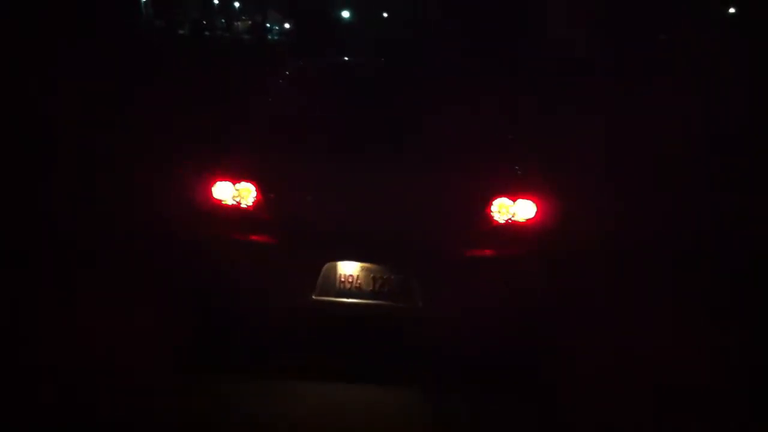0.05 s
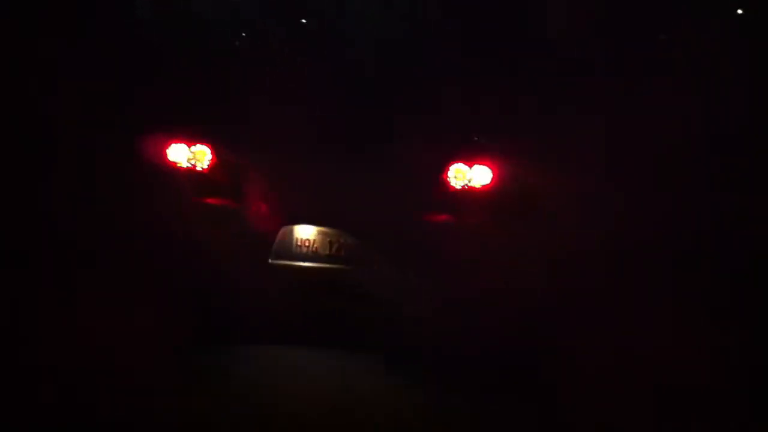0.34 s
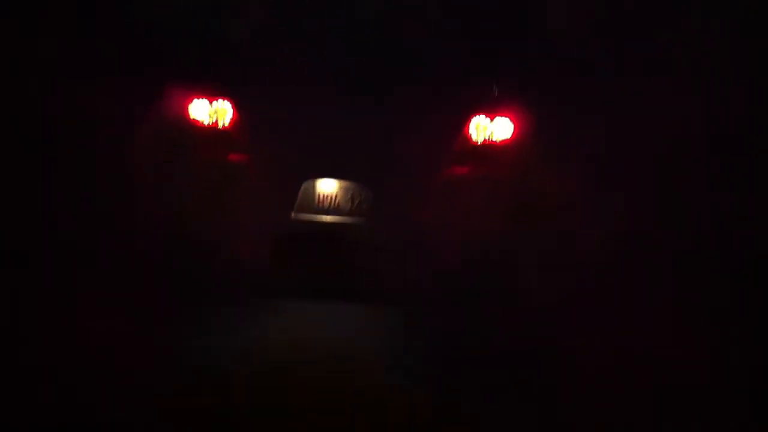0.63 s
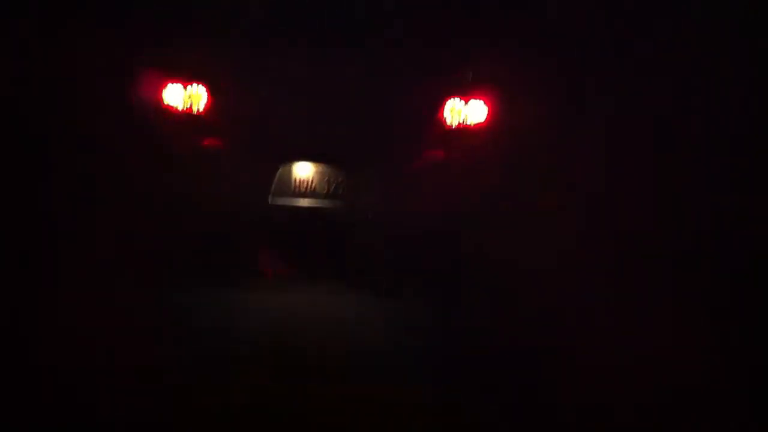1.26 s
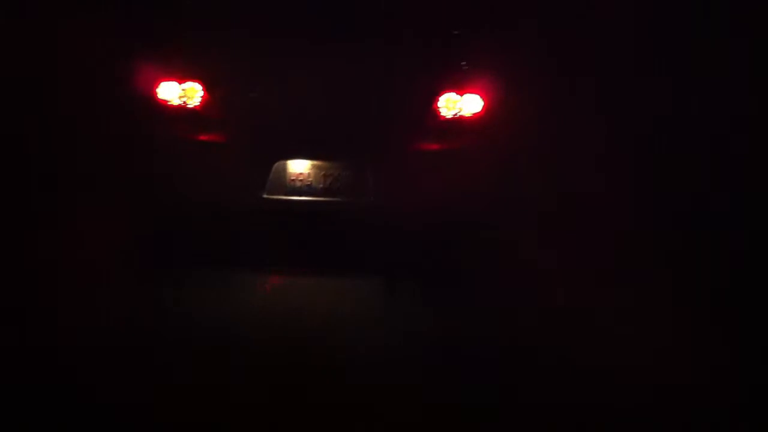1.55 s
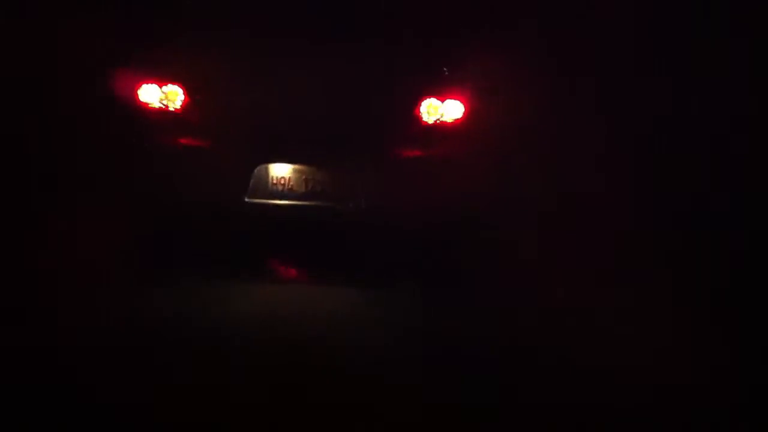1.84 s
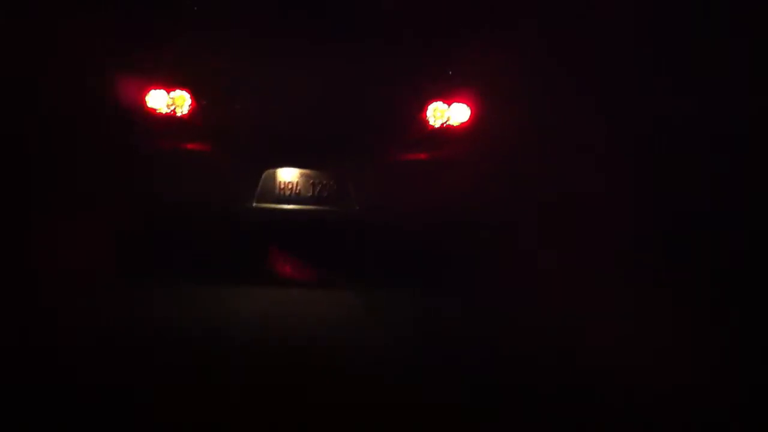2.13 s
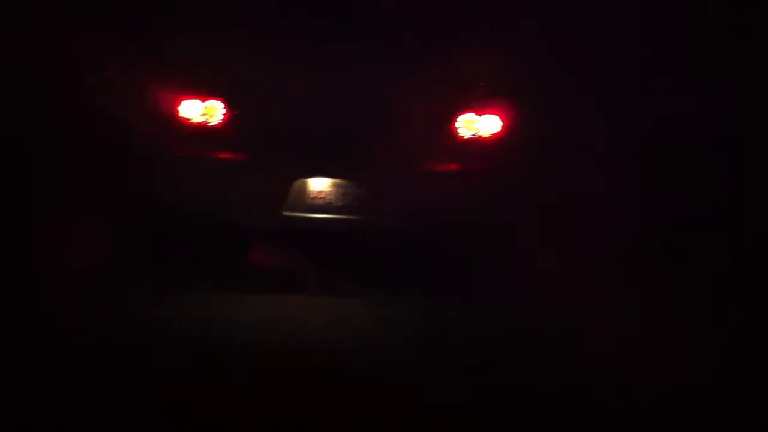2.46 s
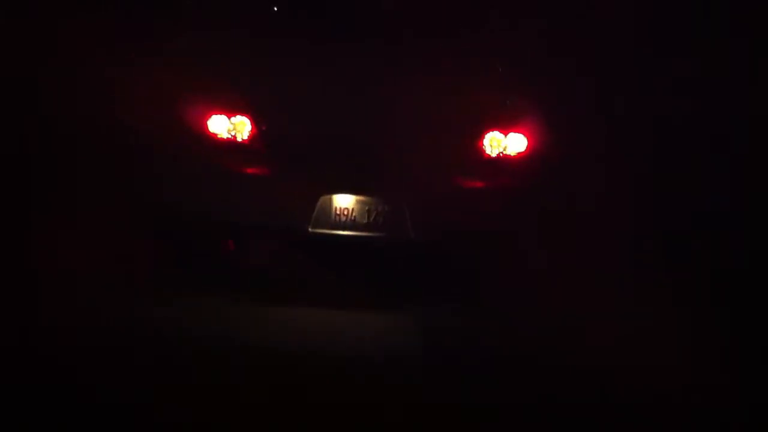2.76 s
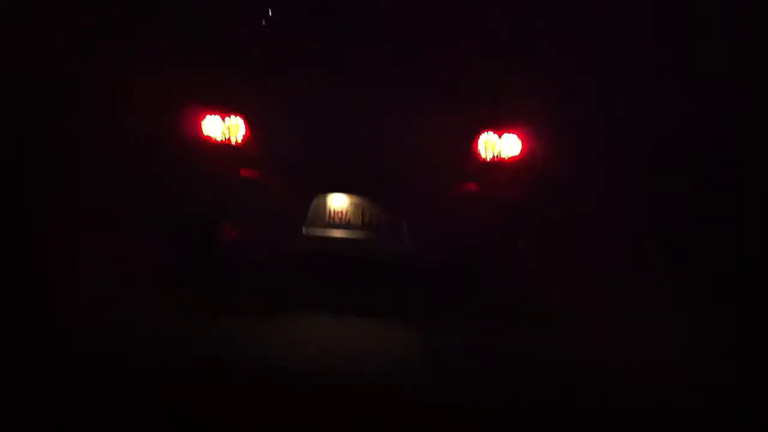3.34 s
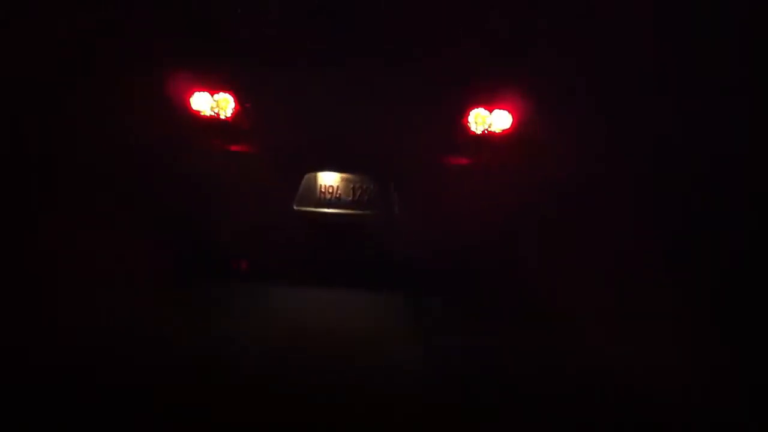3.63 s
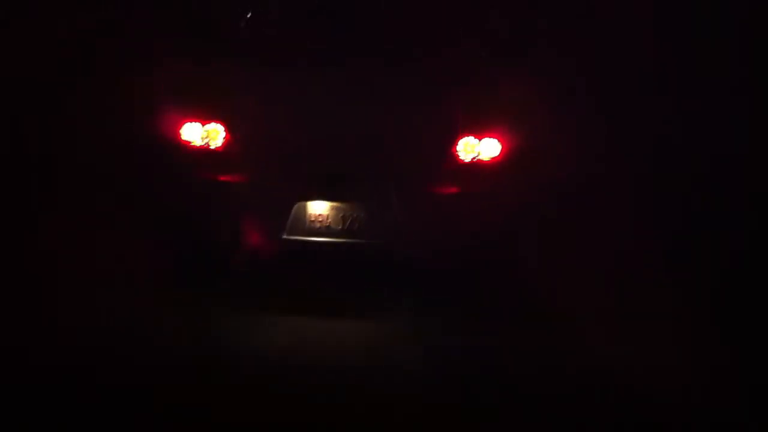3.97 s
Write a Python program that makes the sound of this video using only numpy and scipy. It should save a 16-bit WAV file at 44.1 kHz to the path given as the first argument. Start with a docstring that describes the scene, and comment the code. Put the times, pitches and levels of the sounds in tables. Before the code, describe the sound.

A car engine idles with a strong low rumble that creeps up, with small exhaust pops, a short hiss and one sharp click. It then revs, drops back and revs again, heard close behind the car outdoors.

```python
"""Outdoors at night, close behind a standing car: its idle creeps up, it revs, drops back, revs again.
Two cylinder banks fire in turn into the exhaust, which booms and barks; the silencer shell growls.
Gas rasps with every firing and now and then pops. A short hiss and one sharp click sound over
the whirr of the engine; a limiter holds down the revs."""
import sys
import numpy as np
from scipy import signal
from scipy.fft import rfft, irfft
from scipy.io import wavfile
from scipy.ndimage import uniform_filter1d, minimum_filter1d

SR = 44100
rng = np.random.default_rng(int(sys.argv[2]) if len(sys.argv) > 2 else 0)


def dump_mix(stems):
    """Bounce the given channels to the path in sys.argv[1] as a 16-bit WAV at rate SR."""
    frames = np.atleast_2d(stems).T  # one column per channel
    limited = np.clip(frames, -1, 1)  # hard clip at full scale
    pcm = np.round(limited * 32767).astype(np.int16)
    wavfile.write(sys.argv[1], SR, pcm)


N = 176400

# engine speed (time [s], firing rate [Hz])
FIRING_RATE = [(0.0, 38.82), (0.17, 40.99), (0.8, 43.86), (1.0, 45.8), (1.75, 49.52), (2.5, 51.44),
               (2.93, 52.61), (3.0, 60.12), (3.1, 81.08), (3.2, 104.01), (3.34, 138.31), (3.42, 150.9),
               (3.5, 142.56), (3.64, 135.31), (3.88, 115.65), (4.0, 150.21)]
# exhaust envelopes before trim (time [s], boom [dB], bark [dB], rasp [dB])
EXHAUST_LEVELS = [(0.0, -15.5, -20, -36.5), (0.5, -15.5, -22, -37), (1.5, -17.5, -22, -41.5),
                  (2.3, -17, -20.5, -42.5), (2.92, -16, -19.5, -42.5), (3.03, -14.5, -13, -30),
                  (3.12, -14, -13, -36), (3.18, -35, -11.5, -32), (3.25, -18, -9, -29.5),
                  (3.35, -14.1, -10, -28.5), (3.41, -22.5, -12.5, -38), (3.48, -16, -19.5, -42.5),
                  (3.54, -17, -19.5, -37.5), (3.62, -12.5, -20, -34.5), (3.82, -12.5, -18.5, -36.5),
                  (3.878, -20.6, -22, -40.5), (3.895, -15, -10, -34), (4.0, -18, -9.5, -33)]
# tailpipe resonances (frequency [Hz], relative gain [dB])
TAILPIPE = [(300, -25), (520, 2), (780, -10), (1100, -9.5), (1420, -0.5), (1620, -7), (1880, 7),
            (2150, 0.5), (2380, -5.5), (2850, 1.5), (3500, -4.5), (4400, -19), (6200, -31), (8000, -34.5),
            (15000, -46.5)]


def firings(max_count=320):
    """Number, time, strength and gas strength of each firing; cylinders are unequal."""
    # four cylinders in firing order (strength [dB])
    cylinders = [2.4, -1.3, .5, -1.1]
    start_cycle, jitter_s, size_scatter_db, gas_scatter_db = .64, .00009, .35, 1.6
    cycles = start_cycle + np.cumsum(curve(FIRING_RATE)) / SR
    number = np.arange(1, int(cycles[-1]) + 1)
    chance = rng.standard_normal((max_count, 3))[:len(number)].T
    times = np.interp(number, cycles, clock()) + jitter_s * chance[0]
    cylinder_db = np.array(cylinders)[number % len(cylinders)] * lumpiness(times)
    sizes = undb(cylinder_db + size_scatter_db * chance[1])
    return number, times, sizes, sizes * undb(gas_scatter_db * chance[2])


def lumpiness(times):
    """Cylinders and banks differ at idle and even out as the revs rise."""
    # imbalance (firing rate [Hz], share [0-1])
    imbalance = [(53, 1), (75, .25)]
    rate_hz = np.interp(times, clock(), curve(FIRING_RATE))
    return np.interp(rate_hz, *np.array(imbalance).T)


def pipes(number, times, sizes, crossover_hz=186.4):
    """The banks ring their pipes in turn; returns low boom and high bark."""
    # pipe resonances (frequency [Hz], first bank [dB], second bank [dB])
    resonances = [(30.2, -68.5, -65.5), (58.3, -31.5, -35.5), (80.3, -19.5, -15), (107.6, -5.5, -6.5),
                  (132, -1, 1.5), (203.2, -6, -0.5), (246.6, -10, -4.5), (280, -9, -8), (346.5, -9, -15.5),
                  (423, -25.5, -33), (485, -31, -42.5), (550, -47, -33.5), (778, -34, -41.5),
                  (1480, -72.5, -83)]
    first_share = .5 + lumpiness(times) * (number % 2 - .5)
    tone = 0
    for bank, share in [(1, first_share), (2, 1 - first_share)]:
        tone -= signal.fftconvolve(pulses(times, sizes * share), response(resonances, column=bank))
    hz = np.arange(N + 1) * SR / (2 * N)
    boom = irfft(rfft(tone, 2 * N) / (1 + (hz / crossover_hz) ** 12))[:N]
    return boom, tone[:N] - boom


def exhaust(number, times, sizes, max_count=320):
    """The bark grows under throttle; when it shuts, the boom stays and the bark burbles."""
    # overrun (time [s], throttle shut [0-1])
    overrun = [(3.4, 0), (3.47, 1), (3.86, 1), (3.89, 0)]
    pipe_delay_s, bank_lag_s = .0005, .00022
    burble_lag_s, burble_jitter_s, burble_db = .001, .00006, .8
    boom_trim_db, bark_trim_db = -.6, -1.46
    arrivals = times + pipe_delay_s + bank_lag_s * lumpiness(times) * (number % 2 == 0)
    shut = np.interp(arrivals, clock(), curve(overrun))
    chance = rng.standard_normal((max_count, 2))[:len(number)].T
    late_s = shut * (burble_lag_s * (number % 2) + burble_jitter_s * chance[0])
    boom, _ = pipes(number, arrivals, sizes)
    _, bark = pipes(number, arrivals + late_s, sizes * undb(burble_db * shut * chance[1]))
    boom_gain = undb(curve(EXHAUST_LEVELS, column=1) + boom_trim_db)
    bark_gain = undb(curve(EXHAUST_LEVELS, column=2) + bark_trim_db)
    return steady(boom) * boom_gain + steady(bark) * bark_gain


def gas_flow(times, sizes):
    """Flow leaps at each firing and dies away within the cycle."""
    attack_cycles, decay_cycles, floor_db = .03, .135, -22
    cycles = np.interp(clock(), times, np.arange(len(times)))
    age = cycles % 1
    puff = (1 - np.exp(-age / attack_cycles)) * np.exp(-age / decay_cycles)
    return steady(puff * sizes[cycles.astype(int)] + undb(floor_db))


def rasp(times, sizes, flow, front_db=-11, trim_db=-3.5):
    """Each firing's hard front and puff of turbulent gas ring the tailpipe."""
    push = noise() * flow + undb(front_db) * steady(pulses(times, sizes))
    return through(push * undb(curve(EXHAUST_LEVELS, column=3) + trim_db), response(TAILPIPE))


def growl(number, times, sizes, flow, bank_bias_db=3):
    """Firings and gas shake the silencer shell, one bank harder than the other."""
    # growl envelope (time [s], level [dB])
    levels = [(0, -58), (1.5, -52), (2.92, -51.5), (3.03, -32.5), (3.14, -38), (3.3, -33.5), (3.48, -42),
              (3.62, -36.5), (3.83, -35), (3.875, -45), (3.9, -30.5), (4, -35)]
    # shell resonances (frequency [Hz], relative gain [dB])
    shell = [(250, -24.5), (400, -4.5), (470, 3), (550, -1.5), (640, 0.5), (780, 0), (1050, -8),
             (1420, -1.5), (1700, -10), (3000, -39.5), (9000, -63)]
    ring = response(shell)
    knocks = steady(through(pulses(times, sizes * undb(bank_bias_db * (number % 2))), ring))
    gas = through(noise() * flow, ring)
    return steady(knocks + gas) * undb(curve(levels))


def pops(decay_s=.0013, top_hz=6000):
    """Small cracks ring the tailpipe."""
    # exhaust pops (time [s], burst level [dB])
    events = [(0.9571, -21.5), (1.127, -28), (1.173, -25.5), (3.075, -28), (3.244, -21), (3.331, -28),
              (3.340, -29), (3.889, -24), (3.9116, -17)]
    bursts = noise() * sum(undb(db) * fade(at_s, decay_s) for at_s, db in events)
    cracks = through(bursts, response(TAILPIPE))
    return signal.sosfilt(signal.butter(2, top_hz, fs=SR, output="sos"), cracks)


def thump(at_s=3.8875, level_db=-17.5, top_hz=870, decay_s=.011):
    """A duller pop as the throttle reopens."""
    band = signal.butter(2, [top_hz / 3, top_hz], "band", fs=SR, output="sos")
    gas = signal.sosfilt(band, noise())
    return gas / gas.std() * undb(level_db) * fade(at_s, decay_s)


def click(at_s=2.2577, level_db=-22, decay_s=.00085, tail_s=.0087, tail_db=-13):
    """One sharp click with a short tail."""
    # click spectrum (frequency [Hz], relative gain [dB])
    colour = [(400, -5), (800, 1), (1080, 11), (1450, 4), (2500, -2), (5000, -4), (8500, -13.5),
              (15000, -26)]
    shape = fade(at_s, decay_s) + undb(tail_db) * fade(at_s, tail_s)
    return undb(level_db) * through(noise() * shape, response(colour))


def hiss(at_s=1.19, level_db=-39.5, attack_s=.013, hold_s=.039, decay_s=.028):
    """One short, bright hiss."""
    # hiss spectrum (frequency [Hz], relative gain [dB])
    colour = [(800, 2.5), (3000, 0), (5500, -3), (9000, -9.5), (15000, -17)]
    age_s = clock() - at_s
    shape = np.clip(age_s / attack_s, 0, 1) * np.exp(-np.maximum(age_s - hold_s, 0) / decay_s)
    return undb(level_db) * through(noise() * shape, response(colour))


def whirr(idle_db=-37, swell_db_per_db=.7, flicker_hz=24.79, flicker_db=.9):
    """Engine and gas-flow noise; it flickers slightly and swells with the rasp."""
    # whirr spectrum (frequency [Hz], relative gain [dB])
    colour = [(25, -1), (50, -20), (120, 7), (400, 11.5), (560, 1), (780, -2), (1100, -7.5), (1450, -11),
              (1650, -7), (1950, -10.5), (2400, -14.5), (2900, -8), (3600, -18.5), (4500, -22.5),
              (6200, -21.5), (7600, -28), (10000, -25), (13000, -31.5), (16000, -33)]
    rasp_db = curve(EXHAUST_LEVELS, column=3)
    swell_db = swell_db_per_db * np.maximum(rasp_db - np.median(rasp_db), 0)
    hold = int(SR / flicker_hz)
    flicker = uniform_filter1d(noise()[np.arange(N) // hold], hold)
    return through(noise() * undb(idle_db + swell_db + flicker_db * flicker), response(colour))


def reflections(direct, level_db=-19.5, delay_s=.011, t60_s=.083):
    """Ground and surroundings return a faint, short tail."""
    tail = noise() * fade(delay_s, t60_s / np.log(1000))
    return undb(level_db) * through(direct, tail / np.sqrt(np.sum(tail ** 2)))


def undb(db):
    return 10 ** (np.asarray(db) / 20)


def clock():
    return np.arange(N) / SR


def noise():
    return rng.standard_normal(N)


def curve(table, column=1):
    """Table column, linearly interpolated in time."""
    rows = np.array(table, float)
    return np.interp(clock(), rows[:, 0], rows[:, column])


def response(table, column=1, size=8192):
    """Minimum-phase, unit-energy impulse response from (frequency [Hz], gain [dB])."""
    rows = np.array(table, float)
    hz = np.maximum(np.arange(size // 2 + 1) * SR / size, 1)
    gain_db = np.interp(np.log(hz), np.log(rows[:, 0]), rows[:, column])
    cepstrum = irfft(np.log(undb(gain_db)))
    cepstrum[1:size // 2] *= 2
    cepstrum[size // 2 + 1:] = 0
    ring = irfft(np.exp(rfft(cepstrum)))
    return ring / np.sqrt(np.sum(ring ** 2))


def through(x, ring):
    return signal.fftconvolve(x, ring)[:N]


def steady(x, size=2600):
    """Running rms held at 1."""
    return x / np.sqrt(uniform_filter1d(uniform_filter1d(x ** 2, size), size) + 1e-14)


def fade(start_s, decay_s):
    """Sudden onset, exponential decay."""
    age_s = clock() - start_s
    return (age_s >= 0) * np.exp(-np.maximum(age_s, 0) / decay_s)


def pulses(times, sizes):
    """Impulses, each split between neighbouring samples."""
    place = np.clip(times * SR, 0, N - 2)
    whole = place.astype(int)
    part = place - whole
    return np.bincount(whole, sizes * (1 - part), N) + np.bincount(whole + 1, sizes * part, N)


def scene():
    """All sources plus outdoor reflections, mono."""
    number, times, sizes, gas_sizes = firings()
    flow = gas_flow(times, gas_sizes)
    engine = exhaust(number, times, sizes) + rasp(times, gas_sizes, flow)
    engine += growl(number, times, sizes, flow) + whirr()
    direct = engine + pops() + thump() + hiss() + click()
    return (direct + reflections(direct))[None]


def record(dry):
    """Look-ahead peak limiter, then a steep low-pass."""
    ceiling, window_s, top_hz = .93, .011, 15750
    width = int(window_s * SR)
    needed_gain = ceiling / np.maximum(np.abs(dry), ceiling)
    gain = uniform_filter1d(minimum_filter1d(needed_gain, width), width)
    return signal.sosfilt(signal.ellip(10, .2, 80, top_hz, fs=SR, output="sos"), dry * gain)


dry = scene()
out = record(dry)
dump_mix(out)
```